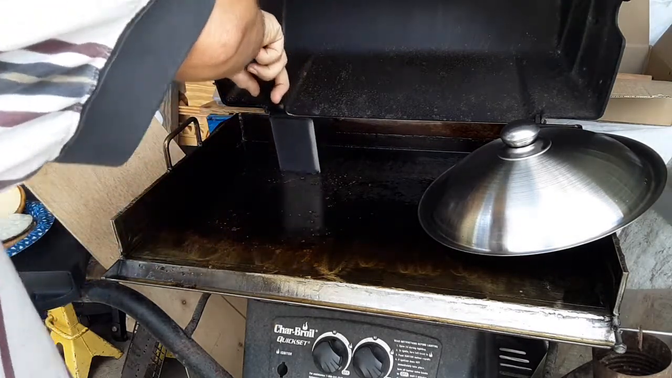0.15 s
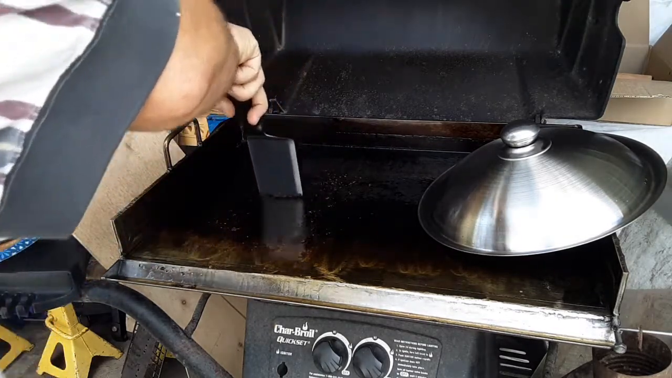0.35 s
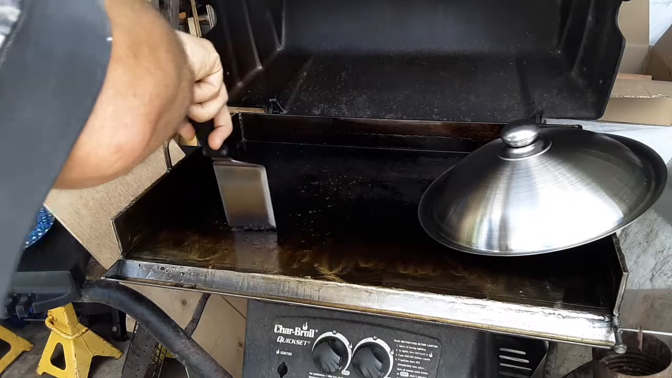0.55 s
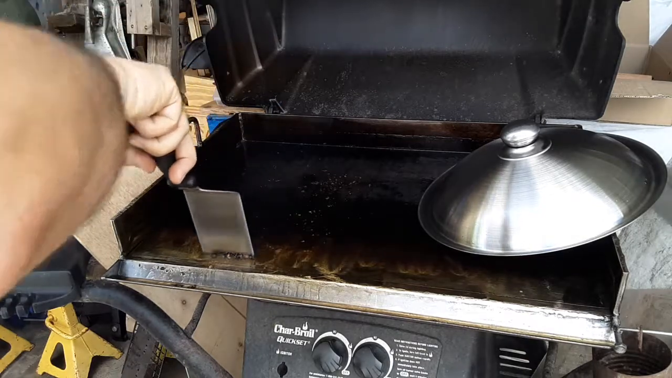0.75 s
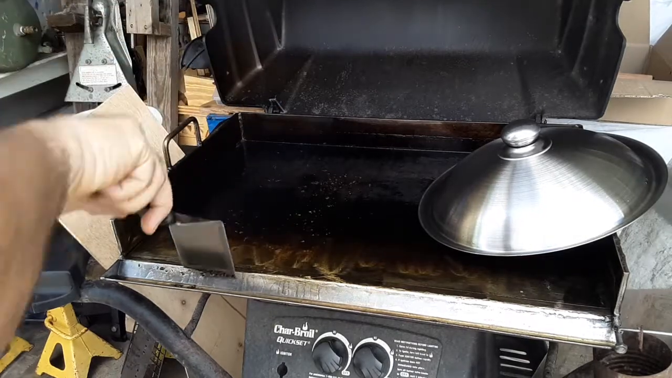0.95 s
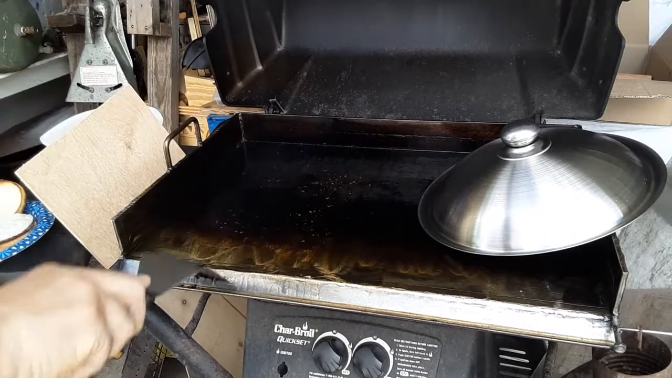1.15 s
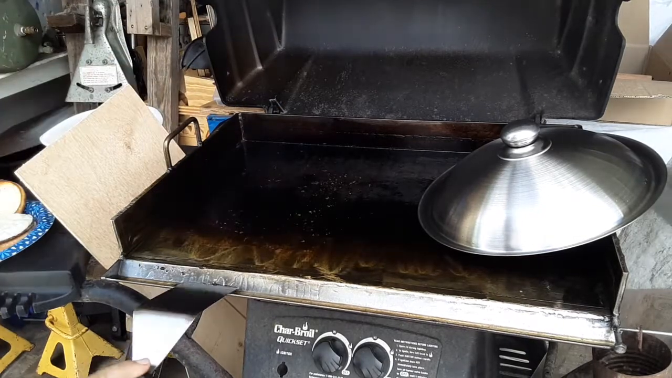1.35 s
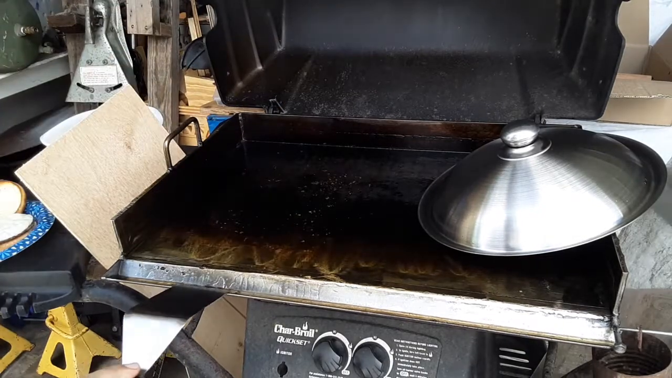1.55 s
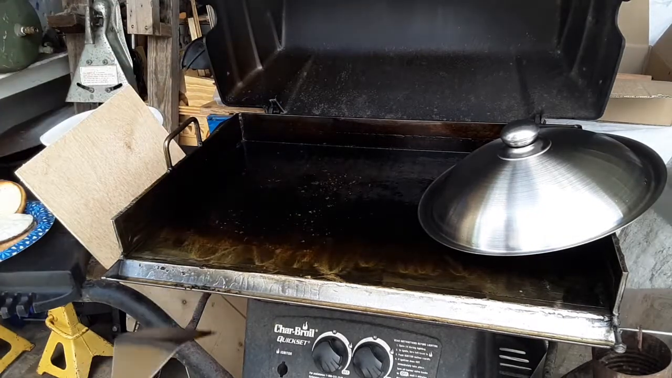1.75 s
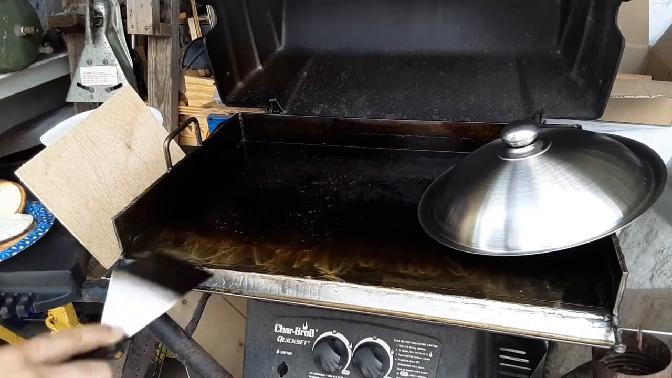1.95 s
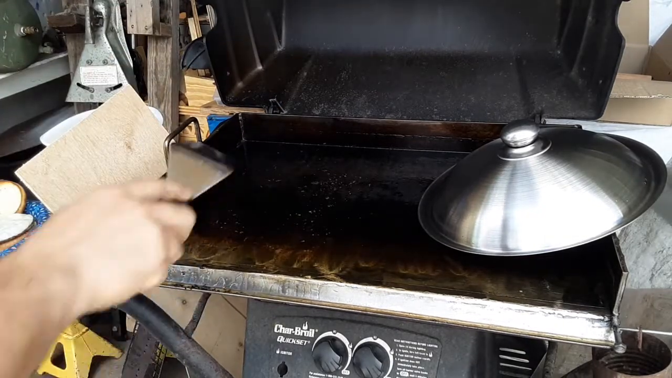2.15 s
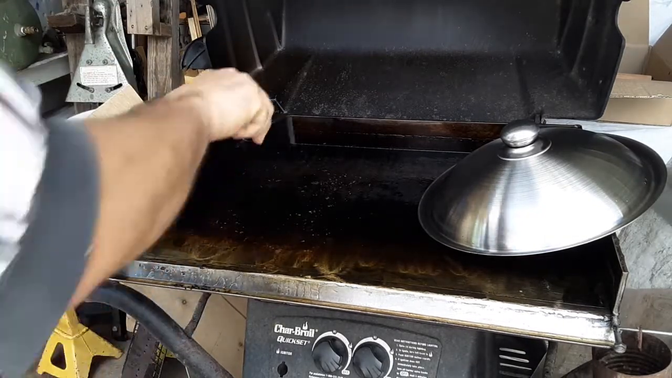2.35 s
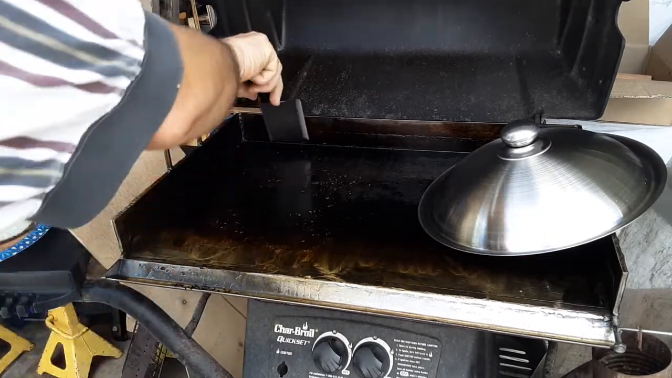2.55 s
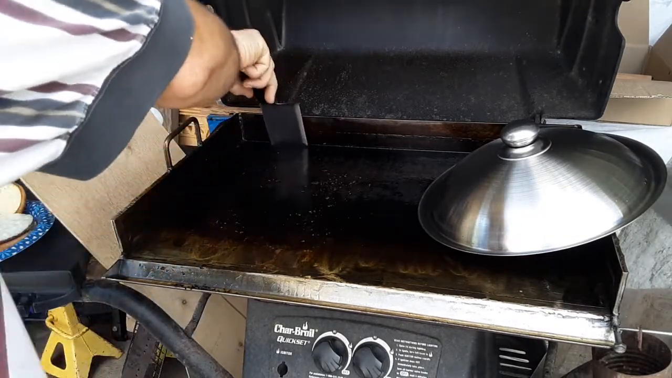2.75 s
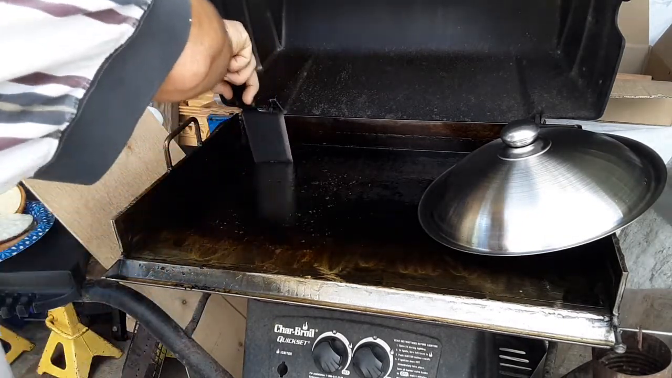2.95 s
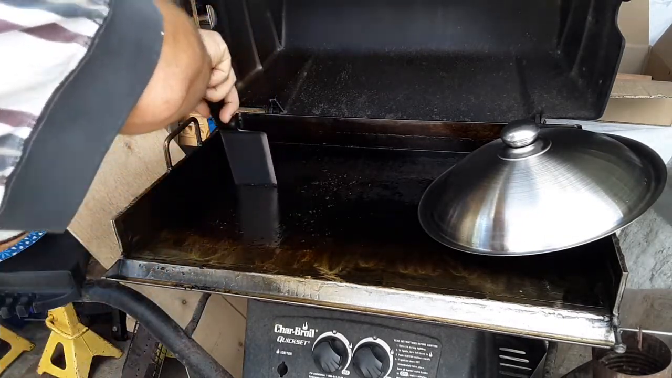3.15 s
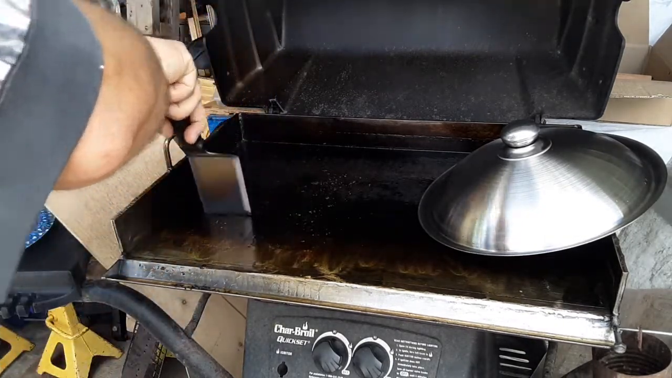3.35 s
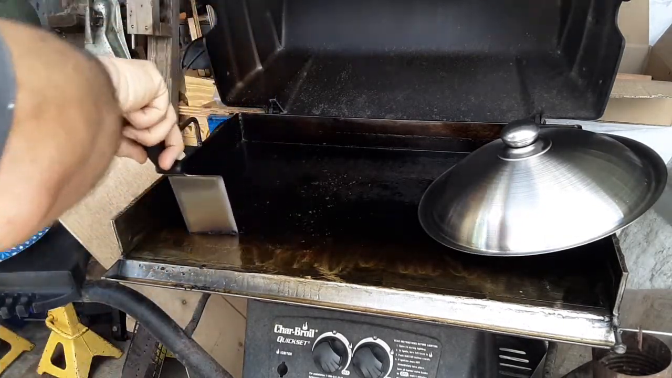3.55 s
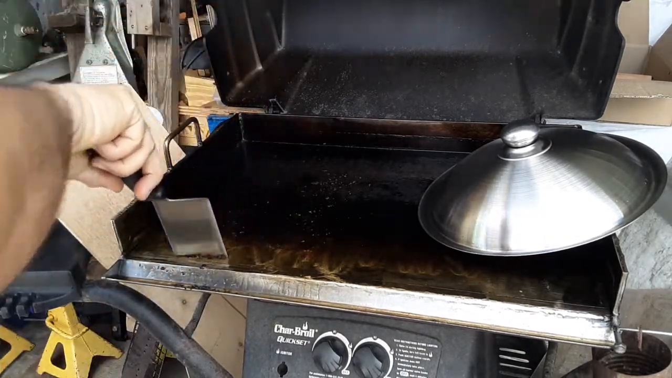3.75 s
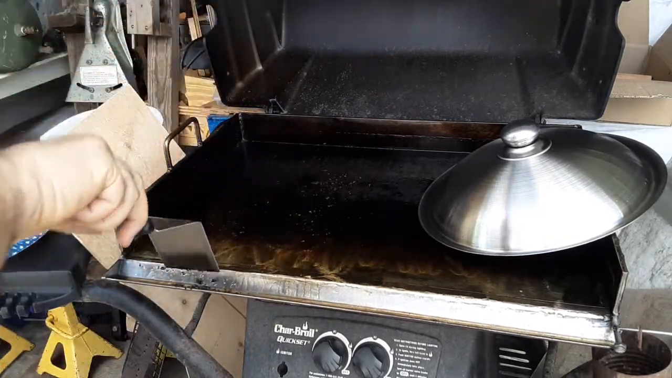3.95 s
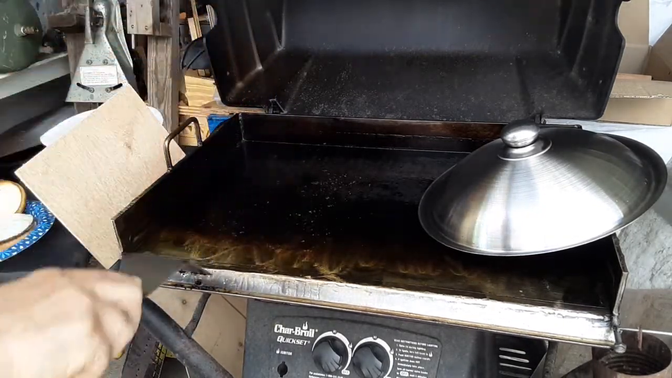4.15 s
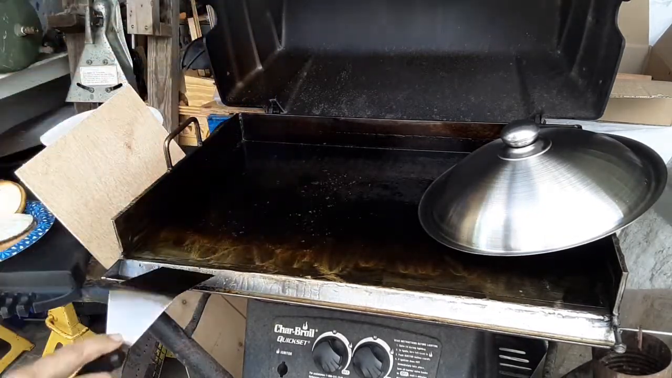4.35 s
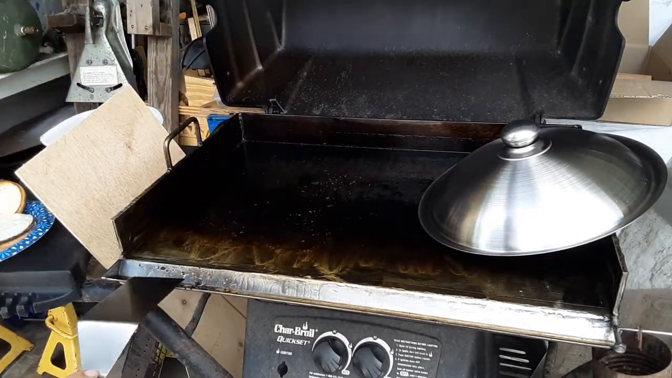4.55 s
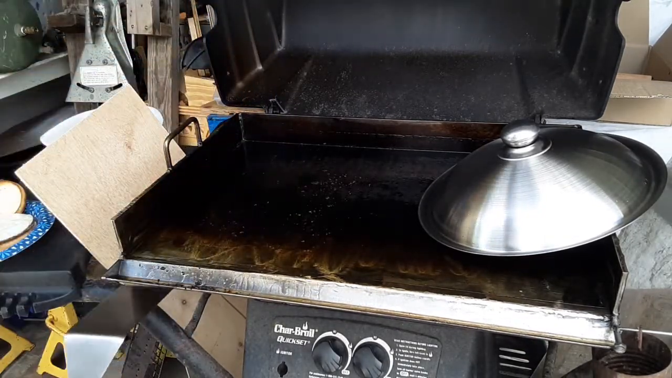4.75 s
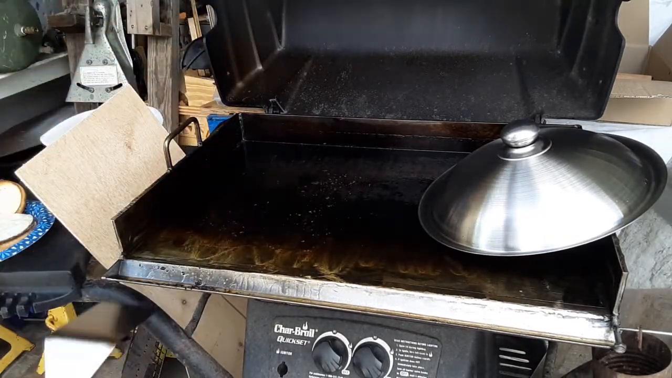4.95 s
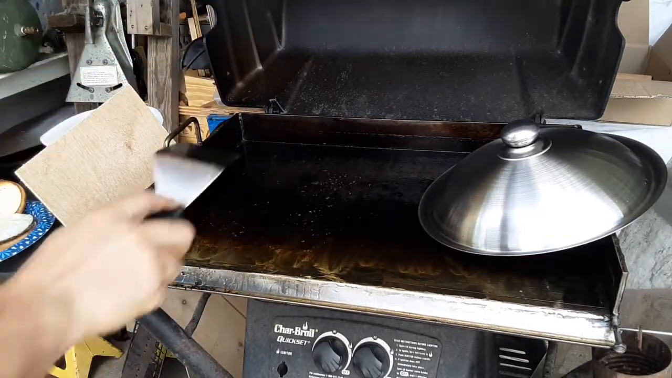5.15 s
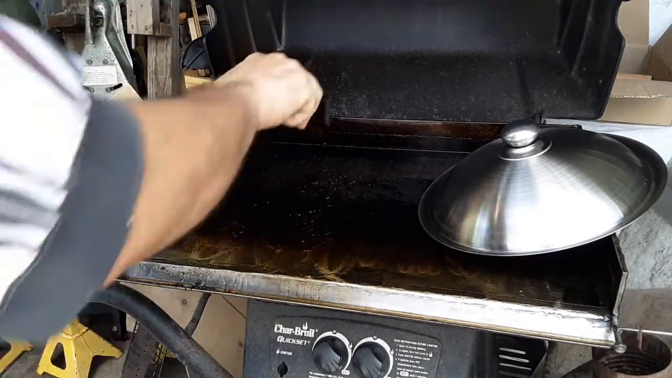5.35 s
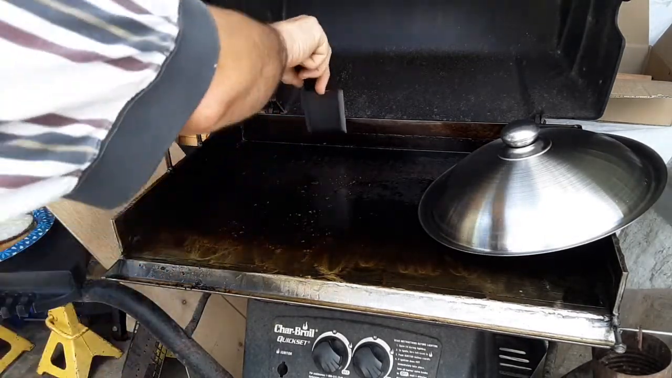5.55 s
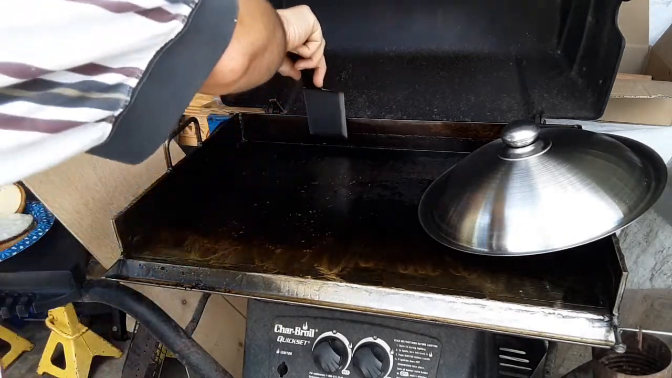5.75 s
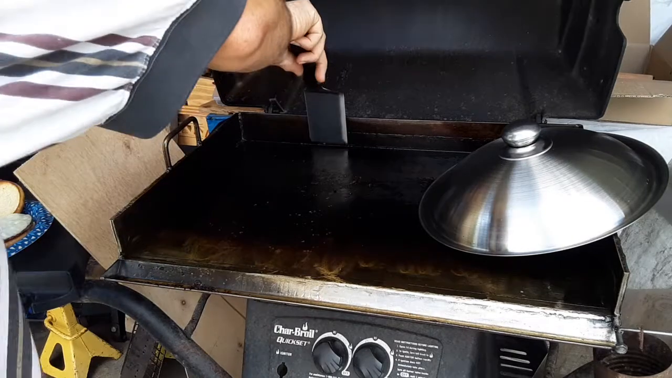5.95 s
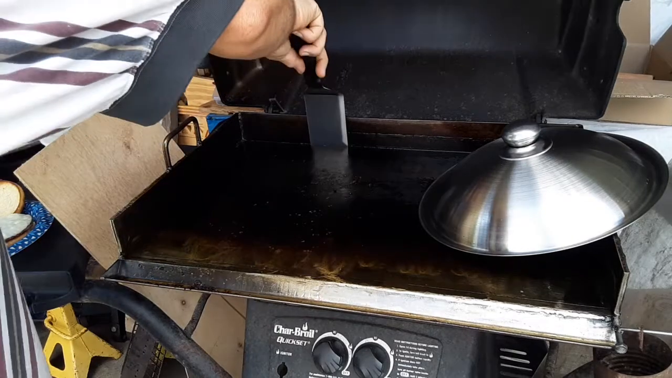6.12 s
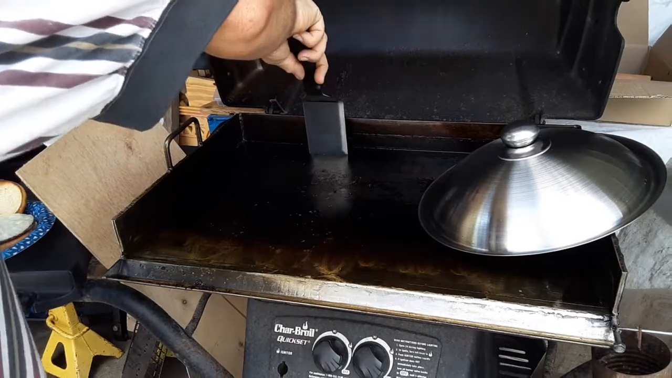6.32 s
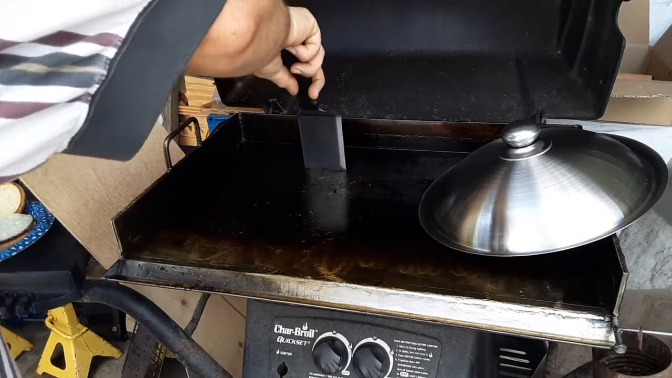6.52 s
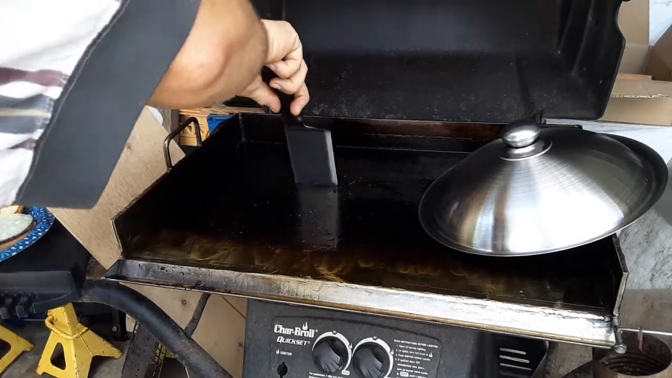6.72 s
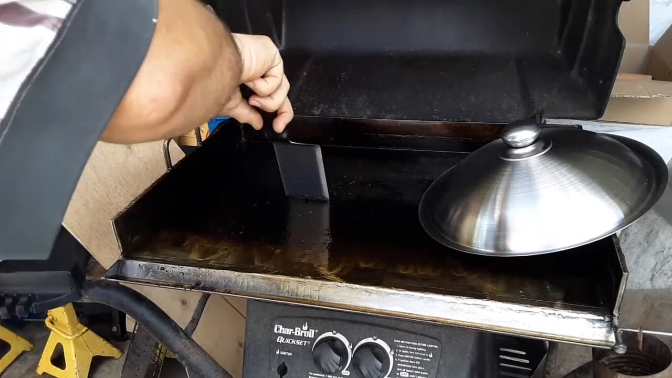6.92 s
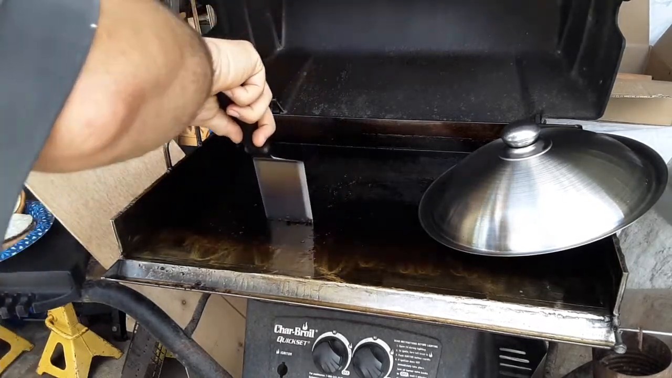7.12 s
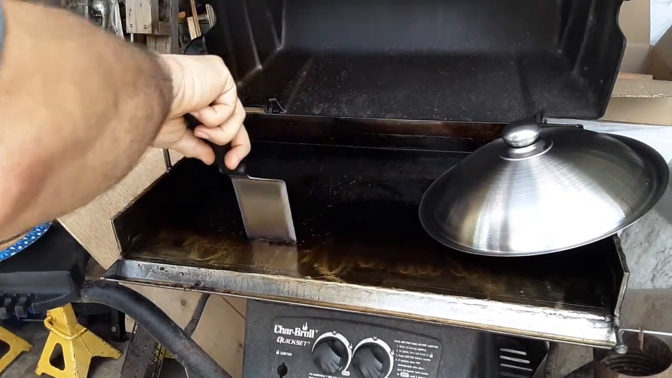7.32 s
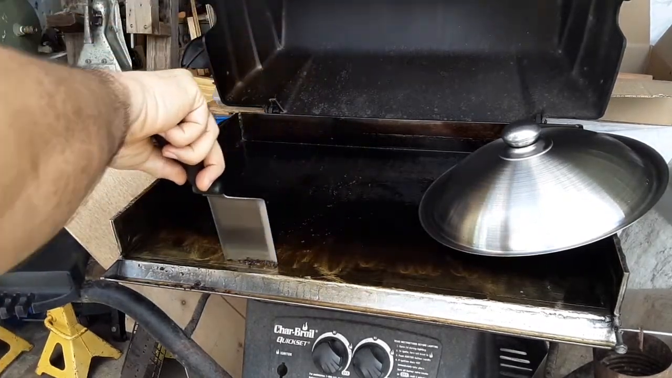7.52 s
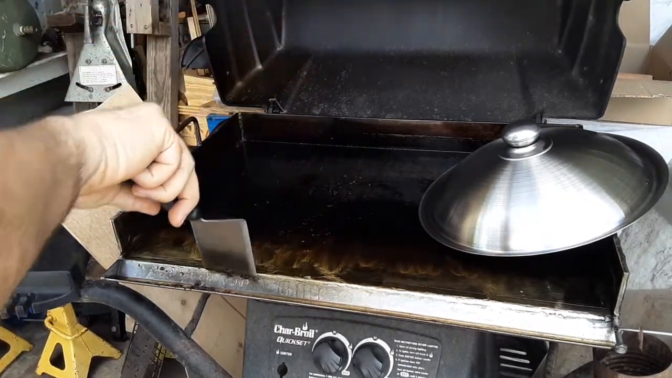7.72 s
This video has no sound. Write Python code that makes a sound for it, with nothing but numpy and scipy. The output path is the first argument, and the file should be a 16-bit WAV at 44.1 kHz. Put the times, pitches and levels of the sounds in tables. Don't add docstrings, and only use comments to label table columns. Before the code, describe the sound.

Close outdoor scraping: gritty metal strokes on a heavy steel plate, blade clanging on rim and trough between them, insects trilling softly behind.

```python
import sys
import numpy as np
from scipy import signal
from scipy.fft import rfft, irfft, next_fast_len
from scipy.io import wavfile
from scipy.ndimage import uniform_filter1d, map_coordinates

SR = 44100
rng = np.random.default_rng(int(sys.argv[2]) if len(sys.argv) > 2 else 0)


def makeup_ratio(level_db):
    decades = np.asarray(level_db, float) / 20
    return 10 ** decades


def persist_wave(psi):
    counts = np.round(np.clip(psi, -1, 1) * 32767).astype(np.int16)
    wavfile.write(sys.argv[1], SR, np.atleast_2d(counts).T)


N = 343228
TIME = np.arange(N) / SR

# t/s, level/dB
GUSTS_DB = [(0, -53.5), (1.05, -60), (1.6, -50.5), (2.7, -60), (4.2, -58), (5.85, -58.5), (6.9, -50.5),
            (7.78, -52.5)]
# f/Hz, level/dB per Hz
RUMBLE_SPECTRUM = [(20, -75), (38, -32), (58, -4), (193, -12), (265, -16), (300, -17), (390, -33.5),
                   (660, -120)]
# f/Hz, likeness
WIND_LIKENESS = [(30, 0.5), (90, 0.15), (160, 0.8)]
# f/Hz, likeness
FAR_LIKENESS = [(60, 1), (240, 0.98), (950, -0.17), (3770, -0.13), (15000, 0.077)]
# f/Hz, level/dB per Hz
AIR_SPECTRUM = [(88, -5.5), (150, -3.5), (439, -15.5), (702, -8), (1360, -20), (1980, -10), (2360, -20),
                (5790, -20), (7180, -10), (8230, -31), (16000, -36)]
# f/Hz, level/dB per Hz
CHORUS_SPECTRUM = [(3240, -41.5), (5500, -23), (6470, 0), (7390, -3), (7880, -6.5), (8200, -39.5),
                   (10700, -68)]
# t/s, depth 0-1, swell/dB
CHORUS_BEAT = [(0, .3, 0), (2.7, .3, -1.5), (4.6, .4, 0.5), (5.3, .7, -1.5), (5.9, 1, 4.5), (7.78, .5, -2)]
# t/s, gap/s, slowing/s per stroke, level/dB, count
CHORUS_STROKES = [
    (2.0645, .0268, 0.0025, -52, 15),
    (2.466, .0268, 0, -42, 11),
]
# f/Hz, level/dB per Hz
TRILL_SPECTRUM = [(7000, -20.5), (8000, -19), (8500, -11), (9600, -7), (10500, -16), (11500, -25),
                  (16000, -29)]
# t/s, level/dB
TRILL_LEVEL = [(0, -53.5), (2.7, -57.5), (4.2, -58), (4.6, -63), (5.1, -77), (5.85, -70.5), (6.9, -67),
               (7.78, -59)]
# t/s, gap/s, slowing/s per stroke, level/dB, count
TRILL_STROKES = [
    (2.0465, .0268, 0.0014, -48, 26),
    (3.881, 0.03, 0, -45, 7),
    (4.0762, .037, 0.002, -47, 12),
]

# f/Hz, likeness
NEAR_LIKENESS = [(60, 0.29), (180, 1), (550, 0.84), (1650, 0.43), (4970, -0.076), (15000, -0.0098)]
# f/Hz, level/dB
NEAR_BALANCE = [(60, -0.5), (180, 0.5), (550, -0.5), (1400, 3.5), (3500, -2.5), (15000, 1)]
# f/Hz, width/Hz, level/dB
HOUSING_NOTCHES = [(7550, 150, -8), (9300, 160, -7)]

# t/s, peak/dB, f/Hz
FRAME_THUDS = [(1.592, -35, 75), (1.62, -34, 110), (1.66, -36, 100), (1.69, -33, 120), (1.712, -25, 105),
               (1.787, -35, 143), (1.865, -40.5, 124), (1.975, -31.5, 98), (2.089, -40.5, 70.5)]
# t/s, peak/dB
CRUST_SNAPS = [
    (0.838, -27.5),
    (2.9343, -14),
    (6.687, -10),
    (7.413, -28.5),
    (7.562, -20.5),
    (7.5954, -34),
    (7.718, -29),
]
# t/s, peak/dB
GRAIN_TICKS = [(0.0364, -15), (2.8754, -13), (2.8814, -14), (3.2764, -13), (3.3144, -14), (3.3374, -13),
               (3.3444, -13), (3.4094, -23), (6.109, -33), (6.3284, -18), (6.3504, -18.5), (6.3964, -18),
               (6.4014, -18), (6.4854, -17), (6.5204, -20), (7.0324, -22), (7.1044, -27), (7.1444, -28)]

# t/s, peak/dB, low/dB, bright/dB, pan/dB
PLATE_BLOWS = [
    (0.1018, -11.5, -30, 2, -1),
    (0.9228, -16, -0.5, -5, 1.5),
    (2.7391, -16.5, 0, 6, -0.5),
    (5.902, -23.5, -8, -7, 0.5),
]
# t/s, peak/dB, low/dB, bright/dB, pan/dB
CRUST_BITES = [
    (.001, -15, -33, -5, -6),
    (6.2191, -36, -17, 9, 1),
    (7.412, -39, -22, 7, -1),
    (7.45, -43, -18, 20, 1.5),
]
# f/Hz, level/dB, t60/s
PLATE_BLOW_MODES = [(285, -31.5, 0.48), (577, -28, 0.18), (716, -22.5, 0.35), (1083, -10, 0.47),
                    (1308, -9, 0.089), (1610, 0, 0.1), (1762, -7.5, 0.4), (1893, 12, 0.038),
                    (2050, -4, 0.24), (2180, -7, 0.42), (2520, -14, 0.17), (2745, -6.5, 0.25),
                    (2965, -19, 0.28), (3925, -6.5, 0.058)]
# t/s, peak/dB, low/dB, bright/dB, pan/dB
FLAT_DROP = [
    (6.0153, -6, -8, -11, 0.5),
]
# f/Hz, level/dB, t60/s
FLAT_DROP_MODES = [(285, -9, .3), (748, -9, .25), (1087, -5, .4), (1330, 6, .06), (1577, -12, .3),
                   (1825, -5, .3), (1911, 13, .04), (2234, -4, .35), (2525, -6, .18), (3052, -3, .19),
                   (3950, -8, .015)]
# t/s, peak/dB, low/dB, bright/dB, pan/dB
RIM_BLOWS = [
    (1.2095, -36, 5, 10, 0.5),
    (1.2403, -17, -7, 3, 0),
    (1.3292, -10.5, -20, 2, -0.5),
]
# f/Hz, level/dB, t60/s
RIM_MODES = [(635, -8, .25), (845, -7, .12), (985, -2, .14), (1087, -11, .55), (1351, -5, .16),
             (1620, -5, .15), (1992, -2, .2), (2056, 0, .2), (2525, -8, .17), (3047, -5, .14),
             (3250, -5, .13), (5276, -15, .17), (5733, -11, .15), (6336, -9, .15)]
# f/Hz, level/dB, t60/s
PLATE_HUM_MODES = [(222.7, -6, 0.47), (283.5, -6, 0.64), (660, -7.5, 1.15), (706, -6, 1.94),
                   (1089, -4, 0.65)]
# t/s, peak/dB, low/dB, bright/dB, pan/dB
TROUGH_BLOWS = [
    (4.5948, -2.5, -23, 5, 0),
                (4.621, -5.5, -16.5, -1, -0.5),
]
# f/Hz, level/dB, t60/s
TROUGH_MODES = [(215, -9, .4), (1000, -4, .18), (1028, -10, .45), (1631, -5, .18), (1728, -2, .26),
                (1790, -16, .5), (2040, -1, .17), (2557, -8, .2), (3015, -9, .2), (3515, -8, .16),
                (4646, -9, .15), (5286, -5, .15), (6266, -5, .13), (6858, -9, .14)]
# t/s, peak/dB, low/dB, bright/dB, pan/dB
BLADE_LIFTS = [
    (1.712, -28.5, -8, -9, 3.5),
    (3.888, -44, -31, 8, 6),
    (4.797, -18.5, -4, -6, 1),
]
# f/Hz, level/dB, t60/s
FREE_BLADE_MODES = [(1740, -25, 0.68), (2740, -12, 0.16), (3074, -8, 0.19), (3725, -19, 0.2),
                    (5600, -17, .15), (6870, -6, 0.44), (8670, -15.5, .21), (9790, -18, .16),
                    (10900, -14, 0.1), (11950, -20, .15), (13400, -12, .06)]
# f/Hz, t60/s
CLATTER_T60 = [(150, 0.9), (1000, 0.43), (3000, 0.28), (7000, 0.14), (14000, 0.18)]
# f/Hz, level/dB per Hz
BLOW_SPECTRUM = [(80, -49), (230, 3), (1000, -0.5), (2050, -2), (3400, -2), (6300, 0.5), (7300, 0),
                 (7900, -10.5), (11000, -11), (16000, -27)]

# t/s, f/Hz, peak/dB, rise/s per 20 dB,
# fall/s per 20 dB
PLATE_SWELLS = [(.05, 410, -31.5, 0.4, .06), (.18, 421, -39.5, .06, 0.3), (.3, 240, -36.5, 3, 0.5),
                (.42, 429, -38.5, .1, 0.7), (.56, 236.4, -41.5, .1, .2), (.96, 285, -36, .03, .15),
                (1.255, 705, -30, 0.02, 0.15), (1.41, 1090, -35.5, .05, -0.3),
                (1.725, 1336, -41, 0.1, 0.08), (1.74, 720, -43, 0.5, 0.32), (1.72, 940, -39.5, -0.1, 0.1),
                (2.77, 285, -30, .01, 0.2), (2.77, 200.4, -35, .03, .12), (3.1, 404, -36.5, .15, 0.4),
                (3.1, 199, -38, 0.1, 0.2), (3.17, 228, -36, 0.1, .08), (3.325, 441, -24, .035, .03),
                (3.39, 439, -29.5, -0.5, 0.1), (3.36, 643, -33, 0.5, .12), (3.343, 1092, -24, 0.07, .14),
                (3.46, 1095, -41, .05, .3), (3.3, 798, -33, .1, -0.2), (6.31, 419.7, -34.5, 0.3, 0.23),
                (6.42, 426, -32, 0.5, -0.1), (6.52, 414, -35.5, -0.1, .15), (6.53, 538, -33, 1.5, -0.5),
                (6.73, 549, -36, .05, -0.2), (6.745, 393, -33, 1, 0.1), (6.785, 235.5, -34, 1, 0.15),
                (6.85, 200.6, -41, 1.5, 0.8), (7.12, 438, -37.5, .15, 0.03), (7.63, 270, -43.5, -0.3, 0)]
# t/s, f/Hz, peak/dB, rise/s per 20 dB, fall/s
# per 20 dB
BLADE_SWELLS = [(.063, 6890, -23, .01, 0.04), (.125, 2299, -33, .02, .2), (.106, 4750, -21, .01, .018),
                (.114, 6900, -26, .02, .04), (.95, 1669, -46, .02, .2), (.95, 2153, -45, .02, .12),
                (.48, 1960, -34, .2, 0.4), (2.861, 3260, -30, -0.5, 0.2), (2.851, 2800, -33, 0.5, 0.09),
                (2.869, 4200, -26, 1, -0.2), (2.87, 1577, -31, 4, .15), (2.845, 2050, -22, .06, .05),
                (2.84, 6890, -27, .08, .1), (2.938, 1920, -23, .01, 0.04), (2.985, 1920, -28, .04, .06),
                (3.12, 1910, -29.5, .08, -0.2), (3.16, 1570, -35, -1, 0.3), (3.32, 2290, -27, 0.4, 0),
                (4.793, 3074, -39, .01, 0.04), (4.8, 5700, -40, .03, .04), (4.68, 1025, -35, .05, .12),
                (6.3, 6900, -31, .05, .05), (6.332, 1800, -27.5, 0.1, 0.4), (6.392, 1794, -27, 0.5, -0.1),
                (6.38, 1630, -28, 1, 0), (6.4, 2290, -27, .15, .15), (6.412, 2990, -27, 1, 0.5),
                (6.502, 1350, -34, -0.5, -0.5), (6.52, 1890, -28, 0, -0.02), (6.66, 1910, -36, .1, .2),
                (6.72, 2470, -37, 0.5, -0.5), (7.06, 2290, -33, .06, .2), (7.04, 1302, -37, .06, .1)]

# t/s, peak/dB, rise/s per 20 dB, fall/s per 20 dB, brightness/dB
CRUST_SURGES = [(0.035, -21.5, 4, 0.05, -2.5), (0.063, -23, 0.03, 0.045, -1),
                (0.109, -27.5, 0.03, 0.07, -4), (.2, -43.5, -1, .5, 1), (.37, -41, 0.25, .5, 7.5),
                (.49, -39, 11, .5, -6), (2.76, -27, 0.55, 0.08, -26.5), (2.828, -20, 0.06, 0.04, -5),
                (2.848, -18.5, .04, 0.1, -1), (2.878, -13, 0.04, 0.0223, -9), (2.938, -24, .03, .08, 0),
                (2.99, -29, .3, .2, 0), (3.15, -27.5, 0.19, 0.17, -4), (3.29, -24.5, 0.08, 0.1, 6),
                (3.338, -18.5, 0.1, 0.1, 0), (3.52, -43, .05, 0.73, -0.5), (6.25, -38, .1, 0.3, 4),
                (6.31, -29, 0.1, 0.18, 2), (6.4, -21.5, 0.18, 0.1258, -5.5), (6.501, -26, 0.51, .17, 0),
                (6.712, -25, 0.18, 0.136, -5), (6.6, -36, .2, .3, 3), (7.045, -28, 0.11, 0.22, -1),
                (7.145, -32.5, 0.32, 0.06, -6), (7.25, -43, .15, 0.35, 0), (7.43, -47.5, 0.035, 0.3, 15),
                (7.56, -52.5, 0, 0.1, 3), (7.73, -59, -1.8, -4, 13)]
# t/s, peak/dB, rise/s per 20 dB, fall/s per 20 dB, brightness/dB
LIGHT_SLIDES = [
    (1.6, -45.5, 0.5, 0.42, -3.5),
    (1.716, -36, 0.05, 0.03, -6),
    (4.765, -52, .08, .1, 9),
    (4.79, -37, 0.03, 0.06, 2),
    (5.88, -60, 0, .1, -3),
    (5.97, -38.5, -0.27, 0.1, 1),
]
# from/s, to/s
BLADE_AIRBORNE = [
    (.88, 1.38),
    (1.85, 2.755),
    (3.89, 4.735),
    (4.805, 5.865),
    (6.01, 6.225),
]
# t/s, pressure 0-1
HAND_PRESSURE = [(0, 0.26), (.12, 0.5), (.9, 0.26), (1.6, 0.5), (2.76, 0), (2.95, 0.03), (3.2, 0.73),
                 (3.3, 0.98), (3.6, 0.45), (3.9, 0.1), (4.8, 0.81), (6.4, 0.63), (6.55, 0.98), (6.8, 0.8),
                 (7.5, 0.26)]
# f/Hz, width/Hz, light blade/dB, pressed blade/dB
PLATE_MODES = [(177.7, 4.2, 1.5, -58), (214, 11, 6, -17), (285, 1.9, 13.5, -34), (404, 4.4, 4, 10.5),
               (429.7, 7, -15.5, 11), (549, 4.5, -30, 15.5), (642, 5.5, -37, 12.5), (704.5, 1.3, 12, 13),
               (831, 15, -16, 5.5)]
# f/Hz, width/Hz, light/dB, pressed/dB
BLADE_MODES = [(1027, 2.6, -48, 5.5), (1092, 12, -4.5, 3.5), (1331, 15.5, -16, 0), (1569, 15, -1.5, 4.5),
               (1640, 23, -0.5, -10), (1787, 20, -4, 8), (1907, 60, 7.5, -21.5), (1975, 70, 7, -46),
               (2055, 40, 6, -17.5), (2225, 12, -1, -17), (2290, 13, -12.5, 1), (2547, 10, -21.5, 8),
               (3002, 37, -11, 0.5), (3260, 20, 3.5, -1)]
# f/Hz, width/Hz, light/dB, pressed/dB
EDGE_MODES = [(4120, 10, 5.5, -50.5), (4630, 78, 2.5, -5.5), (5600, 39, 0.5, -6.5), (6135, 120, -3, 3.5),
              (6580, 59, -18, 1), (6860, 48, 4.5, 3.5)]
# f/Hz, width/Hz, level/dB
GRIT_MODES = [(7780, 16, -0.5), (8550, 64, 4.5), (9800, 75, -17), (10940, 35, 6.5), (11750, 52, -10),
              (12700, 54, -19), (13500, 130, -1.5), (15400, 220, -0.5)]
# f/Hz, level/dB per Hz
DENSE_SPECTRUM = [(71, -66), (120, -20.5), (222, -11.5), (341, -12), (949, -14), (1070, -13.5), (1940, 0),
                  (2640, -4.5), (6770, -16), (7500, -23), (11100, -11.5), (16000, -16)]


def unit(x):
    return x / np.sqrt(np.mean(x ** 2) + 1e-20)


def along(points, hz):
    f, v = np.transpose(points)
    return np.interp(np.log(hz + 1), np.log(f + 1), v)


def over_time(points):
    return np.interp(TIME, *np.transpose(points))


def wobble(rate_hz):
    return map_coordinates(rng.standard_normal(int(N * rate_hz / SR) + 4), [TIME * rate_hz])


def filtered(x, response):
    m = next_fast_len(x.shape[-1] + SR // 2)
    return irfft(rfft(x, m) * response(np.fft.rfftfreq(m, 1 / SR)), m)[..., :x.shape[-1]]


def stereo_angle(alike, hz):
    return np.arccos(np.clip(along(alike, hz), -1, 1)) / 2


def paired(x, alike, same=0):
    def path(hz):
        return np.exp(1j * (np.pi / 2 + 1.2 * np.sin(hz / 90) + 1.2 * np.sin(hz / 237)))

    def mid_side(hz):
        angle = stereo_angle(alike, hz)
        return np.array([np.cos(angle), np.sin(angle)])

    other = np.sqrt(1 - same) * x[1] + np.sqrt(same) * filtered(x[0], path)
    mid, side = filtered(np.array([x[0], other]), mid_side)
    return np.array([mid + side, mid - side])


def patchy(patchy_db, tall, long):
    z = signal.stft(rng.standard_normal((2, N)), nperseg=512)[2]
    field = uniform_filter1d(rng.standard_normal(z.shape[1:]), tall, 0)
    field = uniform_filter1d(field, long, 1)
    return unit(signal.istft(z * makeup_ratio(patchy_db * unit(field)), nperseg=512)[1][:, :N])


def resonances(f, modes):
    total = 0
    for k, (c, w, db) in enumerate(modes):
        total = total + (-1) ** k * makeup_ratio(db) * 1j * f * w / (c * c - f * f + 1j * f * w)
    return total


def rush(spectrum, patchy_db, alike=FAR_LIKENESS):
    noise = filtered(patchy(patchy_db, tall=6, long=14), lambda hz: makeup_ratio(along(spectrum, hz)))
    return unit(paired(noise, alike))


def wing_strokes(bouts, steady, long_s):
    tiring_db = 0.1
    level = steady.copy()
    for start_s, gap_s, slowing_s, db, count in bouts:
        for k in range(round(count)):
            s = start_s + k * gap_s + slowing_s * k * (k - 1) / 2
            span = slice(round(s * SR), round(s * SR) + SR // 20)
            late = np.maximum(TIME[span] - s, 0) / long_s
            level[span] += makeup_ratio(db - tiring_db * k - 9.5) * late * np.exp(1 - late)
    return level


def wind():
    level_db = over_time(GUSTS_DB) + .6 * wobble(3.7)
    pan_db = np.array([[3.2], [-3.2]])
    return makeup_ratio(level_db + pan_db) * rush(RUMBLE_SPECTRUM, patchy_db=2.0, alike=WIND_LIKENESS)


def chorus():
    level_db, beat_hz = -58.5, 100.5
    s, depth, swell_db = np.transpose(CHORUS_BEAT)
    cycle = beat_hz * TIME + .1 * wobble(9)
    buzz = 1 + np.clip(np.interp(TIME, s, depth), 0, 1) * np.cos(2 * np.pi * cycle)
    steady = makeup_ratio(level_db + np.interp(TIME, s, swell_db)) * unit(buzz)
    return wing_strokes(CHORUS_STROKES, steady, long_s=0.003) * rush(CHORUS_SPECTRUM, patchy_db=1.2)


def trill():
    cycle = 36 * TIME + .25 * wobble(13)
    pulses = 2 + (.5 + .5 * np.cos(2 * np.pi * cycle)) ** 2.5
    steady = makeup_ratio(over_time(TRILL_LEVEL)) * unit(pulses)
    return wing_strokes(TRILL_STROKES, steady, long_s=0.0031) * rush(TRILL_SPECTRUM, patchy_db=1.2)


def garden():
    return wind() + makeup_ratio(-53.5) * rush(AIR_SPECTRUM, patchy_db=2.5) + chorus() + trill()


def frame_thuds():
    t60_s, attack_s = 0.063, 0.0079
    out, t = np.zeros(N + SR), np.arange(SR // 4) / SR
    for s, db, hz in FRAME_THUDS:
        thud = makeup_ratio(db + 6.5 - 60 * t / t60_s) * np.sin(2 * np.pi * hz * t)
        out[round(s * SR):][:len(t)] += thud * (1 - np.exp(-t / attack_s))
    return out[:N] * makeup_ratio([[1.5], [-1.5]])


def crumbs():
    out, t = np.zeros((2, N + SR)), np.arange(SR // 20) / SR
    for events, t60_s in [(CRUST_SNAPS, .035), (GRAIN_TICKS, .006)]:
        for s, db in events:
            noise = rng.standard_normal((2, len(t)))
            out[:, round(s * SR):][:, :len(t)] += makeup_ratio(db - 8 - 60 * t / t60_s) * noise
    return filtered(paired(out[:, :N], NEAR_LIKENESS),
                    lambda hz: hz / np.hypot(hz, 2500) / np.hypot(1, hz / 9000))


def blows(events, modes, ring_db, clatter_db, crack_db, lively):
    out, t = np.zeros((2, N + SR)), np.arange(SR) / SR
    hz, db, t60_s = np.transpose(modes)[:, :, None]
    strongest = max(events, key=lambda e: e[1])
    swing = makeup_ratio(db - 60 * t / t60_s) * np.exp(2j * np.pi * hz * t)

    def colour(blow, f):
        return along([(500, blow[2]), (1000, 0.0085), (3500, 0), (5500, blow[3])], f)

    def crowd(f):
        return 0.48 + resonances(f, [(c, 110, 4.0 + 0.51 * d) for c, d, _ in modes])

    for blow in events:
        phase = rng.normal(0, 0.56, (2, *hz.shape)) * np.minimum(hz / 1500, 1)
        spread_db = colour(blow, hz) - colour(strongest, hz) + rng.normal(0, 1.5, (2, *hz.shape))
        knots_db = rng.normal(0, 4, (len(hz), 45))
        beats_db = np.array([np.interp(t, np.arange(45) / 44, k) for k in knots_db])
        size = makeup_ratio(beats_db * np.minimum(t / .15, 1))
        ring = ((makeup_ratio(spread_db) * np.exp(1j * phase))[..., 0] @ (size * swing)).imag

        f, frame_s, z = signal.stft(rng.standard_normal((2, SR)), SR, nperseg=128)
        z = z * makeup_ratio(along(BLOW_SPECTRUM, f) + colour(blow, f))[:, None]
        z = z * makeup_ratio(-60 * frame_s / (lively * along(CLATTER_T60, f)[:, None]))
        clatter = filtered(signal.istft(z, SR, nperseg=128)[1][:, :SR], crowd)
        clatter = paired(clatter, NEAR_LIKENESS, same=0.14)

        crack = uniform_filter1d(rng.standard_normal((2, SR)), size=3)
        crack = paired(crack * makeup_ratio(3 + blow[3] - 60 * t / .014), NEAR_LIKENESS)

        sound = makeup_ratio(ring_db) * ring + makeup_ratio(clatter_db) * clatter + makeup_ratio(crack_db) * crack
        sound = sound * (1 - np.exp(-t / .0004))
        pan_db = np.array([[.5], [-.5]]) * blow[4]
        out[:, round(blow[0] * SR):][:, :SR] += sound * makeup_ratio(blow[1] + pan_db)
    return out[:, :N]


def knocks():
    out = blows(PLATE_BLOWS + CRUST_BITES, PLATE_BLOW_MODES,
                ring_db=-15, clatter_db=-2.0, crack_db=-4.0, lively=0.82)
    out += blows(FLAT_DROP, FLAT_DROP_MODES, ring_db=-19, clatter_db=-4, crack_db=0, lively=.9)
    out += blows(RIM_BLOWS, RIM_MODES, ring_db=-11.5, clatter_db=0.5, crack_db=-8.0, lively=0.94)
    out += blows(TROUGH_BLOWS, TROUGH_MODES,
                 ring_db=-19.5, clatter_db=-5, crack_db=-17.5, lively=1.03)
    out += blows(BLADE_LIFTS, FREE_BLADE_MODES, ring_db=-8, clatter_db=-12, crack_db=-24, lively=1.05)
    out += blows(RIM_BLOWS + BLADE_LIFTS[:1], PLATE_HUM_MODES,
                 ring_db=-25.0, clatter_db=-39, crack_db=-57.5, lively=1.2)
    return out


def singing(swells):
    q, blur_hz, roughness = 24, 60, 1.25
    out, t = np.zeros((2, N + 2 * SR)), np.arange(-SR // 4, SR // 2) / SR
    contacts_s = [0] + [o[1] for o in BLADE_AIRBORNE] + [k[0] for k in PLATE_BLOWS + RIM_BLOWS]
    for s, hz, db, rise_s, fall_s in swells:
        rise_s, fall_s = np.clip(rise_s, .004, .16), np.clip(fall_s, .01, .3)
        knots = rng.standard_normal(400) + 1j * rng.standard_normal(400)
        drive = np.interp((t - t[0]) * (hz / q + blur_hz), np.arange(len(knots)), knots)
        rough = roughness * min(rise_s / .04, 1)
        landed_s = max(c for c in contacts_s if c == 0 or c < s + .02)
        level = makeup_ratio(db - 20 * np.maximum(-t / rise_s, t / fall_s))
        level = level * np.clip((s + t - landed_s) / .008, 0, 1)
        wave = level * (1 + rough * drive) / np.hypot(1, rough) * np.exp(2j * np.pi * hz * t)
        sides = np.exp(1j * stereo_angle(NEAR_LIKENESS, hz) * np.array([[1], [-1]]))
        out[:, round(s * SR):][:, :len(t)] += (wave * sides).real
    return out[:, SR // 4:][:, :N]


def contact():
    lift_db_per_s, land_db_per_s = 239, 899.5
    round_db = -1.5
    s, db, rise_s, fall_s, bright_db = np.transpose(CRUST_SURGES + LIGHT_SLIDES)[:, :, None]
    t, rise_s, fall_s = TIME[::64], np.maximum(rise_s, .03), np.maximum(fall_s, .02)
    slope_db = 20 * np.maximum((s - t) / rise_s, (t - s) / fall_s)
    power = makeup_ratio(2 * (db + round_db - np.hypot(round_db, slope_db))) + 1e-12
    air_db = 0
    for lift_s, land_s in BLADE_AIRBORNE:
        gap_db = np.minimum(lift_db_per_s * (t - lift_s), land_db_per_s * (land_s - t))
        air_db = air_db + np.maximum(gap_db, 0)
    level_db = 10 * np.log10(power.sum(0)) - air_db
    edge_db = (power * bright_db).sum(0) / power.sum(0)
    return np.interp(TIME, t, level_db), np.interp(TIME, t, edge_db)


def steel(modes, lo_hz, hi_hz, dense_db):
    def response(f):
        centre_db = along(DENSE_SPECTRUM, np.sqrt(lo_hz * hi_hz))
        dense = makeup_ratio(along(DENSE_SPECTRUM, f) - centre_db + dense_db)
        inside = 1 / np.sqrt((1 + (lo_hz / (f + 1)) ** 16) * (1 + (f / hi_hz) ** 16))
        body = inside * (resonances(f, modes) + dense)
        return body / np.sqrt(np.mean(np.abs(body) ** 2))
    return response


def scraping():
    blade_db, edge_db = contact()
    chatter = makeup_ratio(1.1 * wobble(35) + 1.7 * wobble(160) + 2.5 * wobble(900))
    force = unit(chatter * patchy(patchy_db=2.0, tall=3, long=16)) * makeup_ratio(blade_db)
    press = np.clip(over_time(HAND_PRESSURE), 0, 1)
    plate_db = -12.5 - 0.46 * np.maximum(blade_db + 33.5, -25) + 4 * press
    grit_db = -2.5 + 0.94 * edge_db
    sound = filtered(force * makeup_ratio(grit_db), steel(GRIT_MODES, 7100, 17600, dense_db=-7))
    for share, column, dense_db in [(1 - press, 2, -12), (press, 3, -7)]:
        def grip(modes):
            return [(m[0], m[1], m[column]) for m in modes]

        part = force * np.sqrt(share)
        sound += filtered(part, steel(grip(BLADE_MODES), 933, 3190, dense_db))
        sound += filtered(part * makeup_ratio(plate_db), steel(grip(PLATE_MODES), 120, 1057, dense_db + 5.5))
        sound += filtered(part * makeup_ratio(edge_db), steel(grip(EDGE_MODES), 4050, 8230, dense_db - 0.5))
    return paired(sound, NEAR_LIKENESS, same=0.2)


def scene():
    griddle = scraping() + knocks() + crumbs() + singing(PLATE_SWELLS + BLADE_SWELLS)
    griddle = filtered(griddle, lambda hz: makeup_ratio(np.outer([.5, -.5], along(NEAR_BALANCE, hz))))
    return griddle + frame_thuds() + garden()


def roll_off(x):
    return signal.sosfilt(signal.butter(12, 16050, fs=SR, output="sos"), x)


def record(dry):
    def housing(hz):
        notch_db = sum(db * np.exp(-((hz - c) / w) ** 2) for c, w, db in HOUSING_NOTCHES)
        top = np.where(hz < 15950, 1, makeup_ratio(-30) * (hz < 16500))
        return makeup_ratio(notch_db) * top / np.hypot(1, (36 / (hz + 1)) ** 4)

    return roll_off(filtered(dry, housing))


dry = scene()
out = record(dry)
persist_wave(out)
```